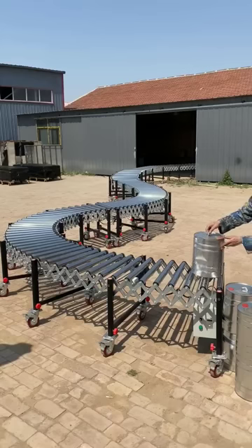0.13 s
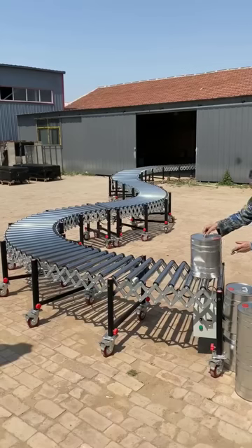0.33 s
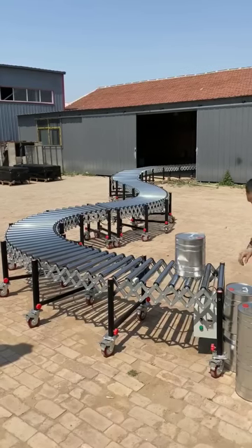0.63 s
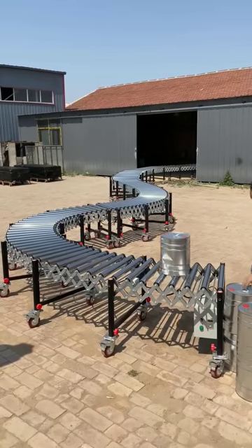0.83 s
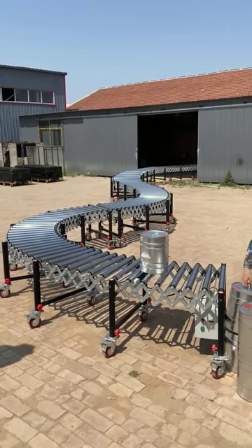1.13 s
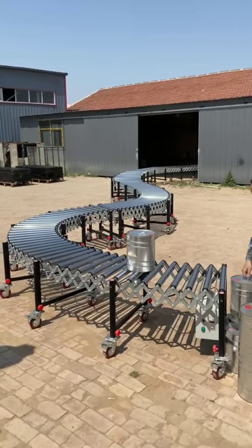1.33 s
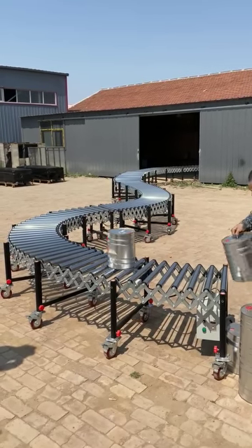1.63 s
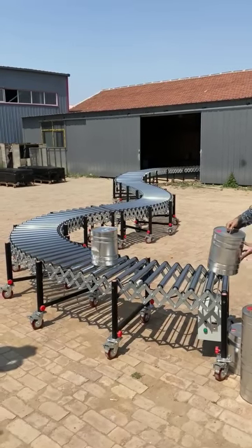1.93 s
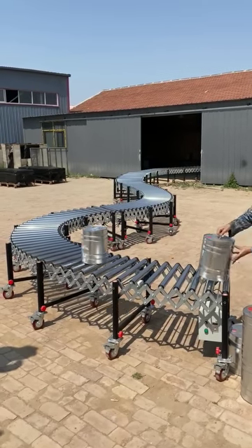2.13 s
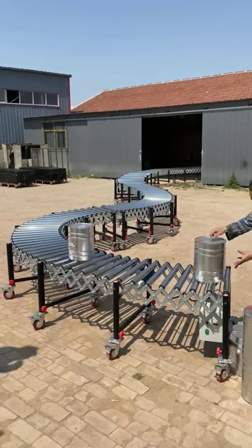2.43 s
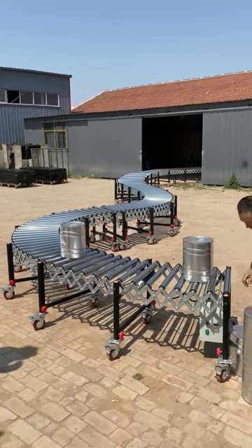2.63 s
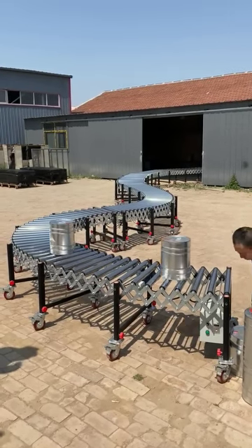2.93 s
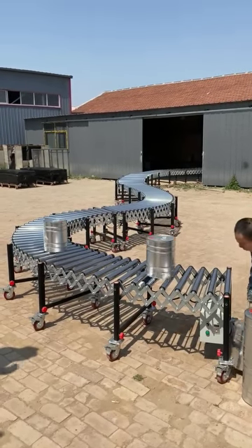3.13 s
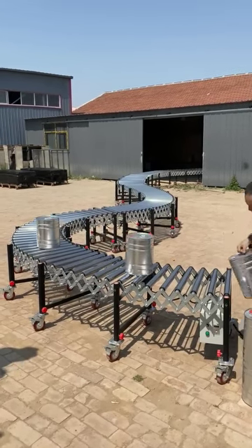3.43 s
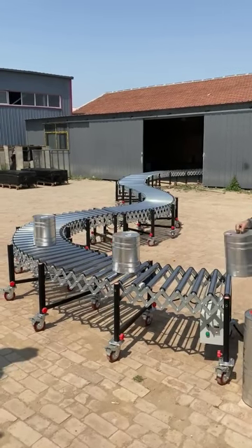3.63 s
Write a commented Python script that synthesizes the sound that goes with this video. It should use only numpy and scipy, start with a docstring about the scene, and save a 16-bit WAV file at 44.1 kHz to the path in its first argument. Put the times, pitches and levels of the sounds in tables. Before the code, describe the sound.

Hollow sheet-metal drums clatter irregularly along conveyor rollers: sharp knocks first, a heavy thud near one second, a quieter rolling stretch, then more clanks and deep thumps with wind on the outdoor stereo microphone.

```python
"""In an open yard, empty sheet-metal drums ride a roller conveyor.
Each time a rim meets a roller, a blow makes the drum knock and shudder; thuds are short, fading tones.
Many tiny contacts ring the metal in between, loose rollers chatter, and the frame rumbles.
Wind, made of low filtered noise, buffets two microphone ports, more so towards the end."""
import sys
import numpy as np
from scipy import signal
from scipy.fft import rfft, irfft
from scipy.io import wavfile

SR = 44100
rng = np.random.default_rng(int(sys.argv[2]) if len(sys.argv) > 2 else 0)


def transcribe(signal):
    """Save signal, clipped to [-1, 1], as a 16-bit WAV file at the path in sys.argv[1]."""
    frames = np.atleast_2d(signal).T
    limited = np.clip(frames, -1, 1)
    pcm = np.round(limited * 32767).astype(np.int16)
    wavfile.write(sys.argv[1], SR, pcm)


N = 166257   # length in samples


def from_db(db):
    """Turn decibels into a number to multiply a sound by."""
    return 10 ** (np.asarray(db) / 20)


def rms_one(x):
    """Scale a sound so its average strength (rms) is 1."""
    return x / np.sqrt(np.mean(x ** 2) + 1e-20)


def in_time(rows):
    """Join the points of a table over time, giving a value at every sample."""
    s, *columns = np.transpose(rows)
    return [np.interp(np.arange(N) / SR, s, column) for column in columns]


def in_pitch(rows):
    """Join the points of a table over pitch, giving a value at every frequency bin."""
    hz, *columns = np.transpose(rows)
    log_bins = np.log(np.fft.rfftfreq(N + SR, 1 / SR) + 1)
    return [np.interp(log_bins, np.log(hz), column) for column in columns]


def band(x, low_hz, high_hz):
    """Keep the sound between two pitches and weaken the rest."""
    return signal.sosfilt(signal.butter(2, [low_hz, high_hz], "band", fs=SR, output="sos"), x)


def mode(x, hz, t60):
    """One resonance: it rings at its own pitch, loses 60 dB in t60 seconds, and has gain 1 at its peak."""
    r = from_db(-60 / (t60 * SR))
    return signal.lfilter([(1 - r * r) / 2, 0, (r * r - 1) / 2],
                          [1, -2 * r * np.cos(2 * np.pi * hz / SR), r * r], x)


# How hard the wind blows on the ports: time_s, level_db
WIND_LEVEL = [(0.15, -42.5), (1.29, -46.5), (1.55, -60), (1.68, -46.5), (1.9, -48), (2.59, -30),
              (2.73, -45), (2.88, -27), (2.92, -34), (3.02, -29), (3.15, -39.5), (3.3, -33), (3.4, -42),
              (3.47, -31), (3.62, -49), (3.69, -36), (3.77, -64)]
WIND_LOW_HZ, WIND_HIGH_HZ = 42, 76
WIND_ALIKE = .88   # share of the wind's power that both ports have in common


def wind():
    """Moving air presses on the ports as deep noise, mostly alike at both."""
    noise = band(rng.standard_normal((3, N)), WIND_LOW_HZ, WIND_HIGH_HZ)
    shared, left, right = band(noise, WIND_LOW_HZ / 2, WIND_HIGH_HZ * 2)
    buffeting = np.sqrt(WIND_ALIKE) * shared + np.sqrt(1 - WIND_ALIKE) * np.array([left, right])
    return from_db(in_time(WIND_LEVEL)[0]) * rms_one(buffeting)


CHATTER_PER_S, CHATTER_DB, CHATTER_T60_S = 9.4, -2.5, 0.032


def chatter():
    """Loose rollers tap at random: a power factor of 1 that jumps up at each tap and fades back."""
    happens = rng.random(N) < CHATTER_PER_S / SR
    taps = happens * rng.exponential(1, N) * from_db(CHATTER_DB) ** 2
    # this is power, the square of a gain, so 60 dB of fade needs 120 here
    return 1 + signal.lfilter([1], [1, -from_db(-120 / (CHATTER_T60_S * SR))], taps + 1e-18)


# A drum drops its weight on a roller: start_s, level_db (before the soft rise), pitch_hz, t60_s
WEIGHT_DROPS = [(.65, -20, 296, 0.29), (.725, -19, 286.6, 0.26), (0.906, -21, 143, 0.23),
                (0.961, -6.5, 208, 0.095), (1.451, -20, 362, 0.26), (2.262, -34, 117, .12),
                (2.785, -15, 150.6, 0.26), (3.011, -5.5, 68.6, 0.074), (3.274, -23, 61.4, 0.18),
                (3.455, -9, 61, 0.084), (3.509, -5, 96, 0.063)]
THUD_RISE_S = 0.0048


def thuds():
    """A soft blow rings the hollow drum briefly as a fading sine wave; both ports share it."""
    out, age = np.zeros((3, N + SR)), np.arange(SR // 2) / SR
    for start_s, level_db, pitch_hz, t60_s in WEIGHT_DROPS:
        i = int(start_s * SR)
        fade = from_db(level_db - 60 * age / t60_s)
        rise = 1 - np.exp(-age / THUD_RISE_S)
        out[0, i:i + len(age)] += fade * rise * np.sin(2 * np.pi * pitch_hz * age)
    return out[:, :N]


# A rim meets a roller: start_s, treble_db, middle_db and body_db (both over treble), treble_t60_s,
# crack_db (over treble, later capped); the band trims below are added to the levels
RIM_KNOCKS = [(0.1308, -37.5, 8, 9, 0.42, 9), (0.297, -22.5, -1, -0.5, 0.17, 8),
              (0.332, -33, 9.5, 7.5, 0.83, 1), (0.377, -24.5, -1.5, 3, 0.23, 7),
              (0.4254, -32.5, 8.5, 10, 0.24, -13), (0.609, -39.5, -61, -18, 0.68, 10.5),
              (0.7069, -34, 6, 6, 0.63, 6), (0.7697, -34, 2, 8.5, 0.052, 10),
              (0.885, -30.5, 0.5, 0.5, 0.24, -4), (0.9318, -33, 7, 3, 0.36, -2),
              (1.0613, -33.5, 4.5, 8, 0.33, -1), (1.1167, -37.5, 2, 13.5, 0.23, 8.5),
              (1.2314, -34, 3.5, 3.5, 0.47, -7), (1.314, -35, 7, -19, 0.49, 17),
              (1.7688, -46, 11, 12, 0.33, 2), (1.943, -42.5, 8, -12, 0.36, 3),
              (1.9875, -40.5, 0.5, -14, 0.31, 12), (2.112, -35.5, 4.5, 8.5, 0.22, 8),
              (2.167, -36, 4, 8, 0.54, -6), (2.2386, -27, 0.5, -1, 0.39, 7),
              (2.35, -36, -31, -16, 0.17, -2), (2.431, -24.5, -2.5, -4, 0.16, 13),
              (2.4594, -36, 10, -5, 0.64, -11), (2.5167, -34, 4.5, 7, 0.39, -8),
              (2.6331, -36.5, 1.5, 16, 0.41, 3), (2.6767, -35, 5.5, -8, 0.77, 2),
              (2.781, -31, 3.5, 6.5, 0.34, -2), (2.9173, -30.5, 1, 3.5, 0.29, -17),
              (2.972, -36, 2.5, 11, 0.48, -5), (3.068, -35, 2, 8, 0.79, -22),
              (3.1282, -36.5, 8, 11.5, 0.12, 7), (3.2696, -31, 1.5, -2.5, 0.28, -8),
              (3.3297, -33.5, 5.5, 2, 0.37, 1), (3.4084, -37.5, 3.5, 8.5, 0.22, -7),
              (3.499, -38.5, 6, 9, 0.26, 19), (3.6599, -31.5, 1.5, 7, 0.28, -3),
              (3.7292, -37, 4, -9, 0.73, 8)]
CRACK_TOP_DB = 11   # highest a crack may stand over the knock's treble
STARTS_S, TREBLE_KNOCK_DB, MIDDLE_OVER_DB, BODY_OVER_DB, TREBLE_T60_S, CRACK_OVER_DB = np.transpose(RIM_KNOCKS)
CRACK_OVER_DB = np.minimum(CRACK_OVER_DB, CRACK_TOP_DB)


def shudder(db, t60, rise_s):
    """Power of all knocks over time: each has a short rise, then fades evenly in dB."""
    out, t = np.zeros(N), np.arange(N) / SR
    for start_s, level_db, fall_s in zip(STARTS_S, db, t60 * np.ones(len(STARTS_S))):
        i = int(start_s * SR)
        age = t[:min(N - i, SR)]
        fade = from_db(level_db - 60 * age / max(fall_s, .005))
        out[i:i + SR] += (fade * (1 - np.exp(-age / rise_s))) ** 2
    return out


# Resonances of drums and rollers: pitch_hz, level_db (over the broad ring, before scatter), t60_s
RESONANCES = [(113.4, 2, 0.16), (150.3, 1.5, 1), (232.3, 1, 0.2), (282.1, 5.5, 0.52), (319.6, 3, 0.15),
              (346, 6.5, 0.24), (384.9, 4, 0.19), (431, -0.5, 0.18), (745, 3, 0.083), (886.2, 7, 0.46),
              (1098, 3.5, 0.33), (1356, 4.5, 0.25), (1516, 3.5, 0.05)]
# Broad ring of the sheet metal before the bands are levelled: pitch_hz, level_db
METAL_COLOUR = [(90, 10.5), (200, -0.5), (400, -2.5), (500, -2.5), (900, -3), (1250, -6.5), (1550, -8),
                (1800, -13), (2500, -20), (3150, -25.5), (3750, -25.5), (4600, -25.5), (5600, -30),
                (6200, -34.5), (6900, -28.5), (8500, -36), (10500, -37.5), (12100, -46), (13300, -62)]
CONTACTS_PER_S, CONTACT_SPREAD_DB = 5000, 2.5
STRIKE_DB = 16   # the blow over the small contacts, before its crack level is added
MODE_SHIFT, MODE_SCATTER_DB = .025, 3   # spread per knock: pitch (share) and strength
RUMBLE_TOP_HZ = 130   # resonances up to here keep their strength and pitch
# extra high resonances at scattered pitches, ringing with varied strength from knock to knock
HIGH_LOW_HZ, HIGH_TOP_HZ, HIGH_DB, HIGH_T60_S, HIGH_SCATTER_DB = 2000, 11500, -1, .1, 6.0


def metal():
    """Blows and tiny contacts ring the metal along three paths: shared, left port only, right port only."""
    sizes = from_db(CONTACT_SPREAD_DB * np.minimum(rng.exponential(1, (3, N)), 5))
    sizes *= rng.choice([-1, 1], (3, N))
    contacts = rms_one(sizes * (rng.random((3, N)) < CONTACTS_PER_S / SR))
    starts = (STARTS_S * SR).astype(int)
    contacts[0, starts + 40] += from_db(STRIKE_DB + CRACK_OVER_DB)
    broad = irfft(rfft(contacts, N + SR) * from_db(in_pitch(METAL_COLOUR)[0]))[:, :N]

    high_hz = HIGH_LOW_HZ * (HIGH_TOP_HZ / HIGH_LOW_HZ) ** rng.random(size=90)
    modes = [(hz, db, t60, MODE_SCATTER_DB) for hz, db, t60 in RESONANCES]
    modes += [(hz, HIGH_DB, HIGH_T60_S, HIGH_SCATTER_DB) for hz in high_hz]
    # every knock gives each resonance above the low rumble a new strength and pitch
    luck = np.clip(rng.standard_normal((len(starts), len(modes), 2)), -2, 2)
    out = broad.copy()
    for k, (hz, db, t60, scatter_db) in enumerate(modes):
        mode_luck = luck[:, k] * (hz > RUMBLE_TOP_HZ)
        for i, j, (strength, shift) in zip(starts, [*starts[1:], N], mode_luck):
            # silence after the piece leaves room for the ring to die away
            piece = np.pad(broad[:, i:j], ((0, 0), (0, int(t60 * SR / 2))))[:, :N - i]
            piece = piece * from_db(db + scatter_db * strength)
            out[:, i:i + piece.shape[1]] += mode(piece + 1e-18, hz * (1 + MODE_SHIFT * shift), t60)
    return out


SHIMMER_PER_S, SHIMMER_DB = 28, 3.8


def shimmer(x):
    """The treble shimmers unevenly: each narrow band swells and sinks at random."""
    spectrum, hz = rfft(x), np.fft.rfftfreq(N, 1 / SR)
    edges = np.geomspace(2400, 14000, 20)
    out = irfft(spectrum * (hz < edges[0]), N)
    steps = np.arange(N) / SR * SHIMMER_PER_S
    count = int(steps[-1]) + 2
    for low, high in zip(edges, edges[1:]):
        swing = np.interp(steps, np.arange(count), rng.standard_normal(count))
        out += from_db(SHIMMER_DB * swing) * irfft(spectrum * ((hz >= low) & (hz < high)), N)
    return out


# Continuous rolling sound, rising and falling, before chatter and knocks:
# time_s, body_db, middle_db, treble_db
ROLLING_LOAD = [(0.26, -40.5, -59, -54.5), (0.31, -56, -44, -54), (0.5, -33, -36, -51.5),
                (1.23, -37, -35, -53), (1.52, -33.5, -40, -56), (1.78, -40, -46, -54),
                (2.02, -37.5, -43, -54.5), (2.33, -37.5, -41.5, -50), (2.7, -30, -35.5, -55),
                (3.2, -41.5, -43.5, -44), (3.54, -33.5, -37, -43), (3.77, -37.5, -38, -51)]
# Low rumble: time_s, frame_rumble_db, drum_boom_db
LOW_RUMBLE = [(0.14, -31, -34.5), (0.2, -71, -46), (0.33, -33, -34.5), (0.4, -77, -32), (0.8, -37, -33.5),
              (0.83, -71, -35.5), (0.99, -28.5, -28.5), (1.02, -31, -38.5), (1.47, -46.5, -46),
              (2.22, -38.5, -37.5), (2.27, -35, -21), (2.34, -35.5, -33), (2.88, -32.5, -41),
              (2.92, -48, -36), (3.03, -29, -31), (3.1, -38, -40.5), (3.47, -37, -36.5), (3.52, -35.5, -40),
              (3.6, -38.5, -47), (3.69, -25.5, -37.5), (3.77, -33, -38)]
MIDDLE_T60_S, BODY_T60_S, CRACK_T60_S = 0.84, 0.4, 0.0071
TREBLE_RISE_S, MIDDLE_RISE_S, BODY_RISE_S = 0.0021, 0.0019, 0.0058
TREBLE_DB, MIDDLE_DB, BODY_DB = -2, -1.5, -1   # trims added to all knocks


def drums():
    """Knocks and rolling shape the metal's ring band by band; the body swells more slowly than the treble."""
    ring, taps = shimmer(metal()), chatter()
    body_roll, middle_roll, treble_roll = [from_db(c) ** 2 for c in in_time(ROLLING_LOAD)]
    cracks = shudder(TREBLE_KNOCK_DB + CRACK_OVER_DB, CRACK_T60_S, TREBLE_RISE_S)
    treble_knocks = shudder(TREBLE_KNOCK_DB + TREBLE_DB, TREBLE_T60_S, TREBLE_RISE_S)
    middle_knocks = shudder(TREBLE_KNOCK_DB + MIDDLE_OVER_DB + MIDDLE_DB, MIDDLE_T60_S, MIDDLE_RISE_S)
    body_knocks = shudder(TREBLE_KNOCK_DB + BODY_OVER_DB + BODY_DB, BODY_T60_S, BODY_RISE_S)
    treble = treble_roll * taps + treble_knocks + cracks
    middle = middle_roll * np.sqrt(taps) + middle_knocks + cracks
    body = body_roll + body_knocks
    # Hz ranges of treble, middle, body, frame rumble, drum boom
    edges = [(2500, 16000), (600, 2500), (260, 600), (90, 130), (130, 260)]
    levels = [np.sqrt(treble), np.sqrt(middle), np.sqrt(body), *from_db(in_time(LOW_RUMBLE))]
    return sum(level * rms_one(band(band(ring, *e), *e)) for level, e in zip(levels, edges))


# How the two ports compare: pitch_hz, likeness (0 to 1), right_lead_rad
PORT_LIKENESS = [(91, 0.8, 0.09), (169, 0.5, 0.12), (405, 0.88, 0.6), (580, 0.31, 3.64), (774, 0.5, 4.67),
                 (1285, 0.43, 6.24), (1490, 1, 6.4), (1800, 1, 7.7), (1974, 0.06, 4.14), (2060, 1, 4.26),
                 (2640, 0, 4.47), (3210, 0.91, 3.5), (3650, 0.21, 2.56), (4460, 1, 2.82),
                 (5065, 0.74, 2.97), (5320, 1, 9), (5870, 0.85, 5.5), (8700, 0.1, 4.94),
                 (11150, 0.98, 1.89), (13200, 1, 3.7)]
# How much louder the right port is than the left: pitch_hz, level_db
RIGHT_OVER_LEFT = [(300, -0.5), (500, -2.5), (750, 4.5), (1200, 0.5), (1500, 0.5), (3000, 1), (6000, 0.5)]


def ports(paths):
    """Each port hears the shared path with its own phase, adds its own path, and tilts the level by pitch."""
    alike, lead = in_pitch(PORT_LIKENESS)
    side = np.array([[-.5], [.5]])   # half of each difference goes to either port
    shared, *own = rfft(np.pad(paths, ((0, 0), (0, SR)), "reflect"))
    common = np.sqrt(alike) * shared * np.exp(1j * lead * side)
    both = common + np.sqrt(1 - alike) * np.array(own)
    return irfft(both * from_db(in_pitch(RIGHT_OVER_LEFT)[0] * side))[:, :N]


# The bass starts central and spreads: time_s, level_db (change to its left-right difference)
BASS_SPREAD = [(1.3, -37), (1.9, -13), (2.3, -13), (2.6, 5)]
BASS_TOP_HZ = 302


def scene():
    """Add drums, thuds and wind; only the bass changes its stereo width over time."""
    left, right = ports(drums() + thuds()) + wind()
    side = (left - right) / 2
    bass = signal.sosfiltfilt(signal.butter(4, BASS_TOP_HZ, fs=SR, output="sos"), side)
    side = side - bass * (1 - from_db(in_time(BASS_SPREAD)[0]))
    return (left + right) / 2 + side * np.array([[1], [-1]])


START_S, CUTOFF_HZ = .1305, 13350


def record(dry):
    """Sound begins after a short silence; a steep filter removes the highest pitches."""
    on = np.arange(N) >= START_S * SR
    return signal.sosfilt(signal.ellip(10, .5, 80, CUTOFF_HZ, fs=SR, output="sos"), dry * on)


dry = scene()
out = record(dry)
transcribe(out)
```